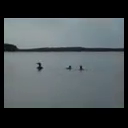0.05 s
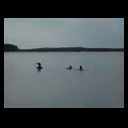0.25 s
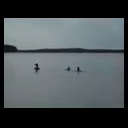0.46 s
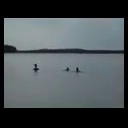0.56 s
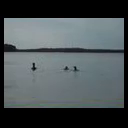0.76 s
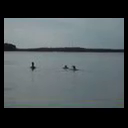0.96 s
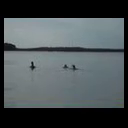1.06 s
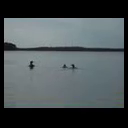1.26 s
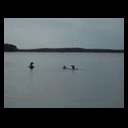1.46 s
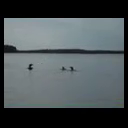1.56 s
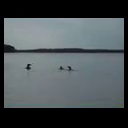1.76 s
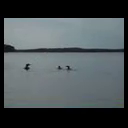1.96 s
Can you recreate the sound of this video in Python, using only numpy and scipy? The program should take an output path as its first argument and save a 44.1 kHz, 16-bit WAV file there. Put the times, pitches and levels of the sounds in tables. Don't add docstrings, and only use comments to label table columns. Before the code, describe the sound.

A loon calls once, loud and close: a low note leaps into a fast, high, pure wavering tremolo, then drops to a low close. A faint echo returns across the calm lake over soft water wash and hiss.

```python
import sys
import numpy as np
from scipy import signal
from scipy.fft import rfft, irfft, next_fast_len
from scipy.io import wavfile
from scipy.ndimage import uniform_filter1d, minimum_filter1d, map_coordinates

SR = 44100
rng = np.random.default_rng(int(sys.argv[2]) if len(sys.argv) > 2 else 0)


def to_wav(sig):
    pcm = np.clip(np.atleast_2d(sig), -1, 1) * 32767
    pcm = np.round(pcm).astype(np.int16)
    wavfile.write(sys.argv[1], SR, pcm.T)


def invert_db(level):
    return 10 ** (np.asarray(level, dtype=float) / 20)


N = 88200
T = np.arange(N) / SR
SKIP_S, LOST_S = .63702, .02


def unit(x):
    return x / np.sqrt(np.mean(x ** 2) + 1e-20)


def wobble(rate):
    return map_coordinates(rng.standard_normal(402), [np.clip(T * rate, 0, 400)])


def coloured(x, points):
    size = next_fast_len(N + 8192)
    hz, db = np.transpose(points)
    log_hz = np.log(np.fft.rfftfreq(size, 1 / SR) + 1)
    gain = invert_db(np.interp(log_hz, np.log(hz), db))
    return irfft(rfft(x, size) * gain, size)[:N]


def rush(points, patchy_db):
    spectrum = signal.stft(rng.standard_normal(N), nperseg=512)[2]
    field = uniform_filter1d(rng.standard_normal(spectrum.shape), size=5, axis=0)
    field = uniform_filter1d(field, size=10, axis=1)
    noise = signal.istft(spectrum * invert_db(patchy_db * unit(field)), nperseg=512)[1][:N]
    return unit(coloured(noise, points))


# (frequency [Hz], level [dB per Hz])
WASH_COLOUR = [(15, -41), (25, -15), (152, -4.5), (178, -3.5), (277, -1.5), (306, -1.5), (738, -6.5),
               (1190, -8), (3000, -24), (3900, -60.5), (6600, -120)]
# (time [s], level [dB])
WASH_LEVEL = [(0.0, -43), (0.17, -42), (0.43, -46), (0.67, -44), (0.87, -41), (2.0, -41.5)]
# (frequency [Hz], level [dB])
HISS_COLOUR = [(880, -33.5), (1500, -4.5), (3960, -13.5), (5240, -16), (5800, -14.5), (6000, -17.5),
               (8130, -18.5), (9620, -21.5), (10600, -33), (11200, -50), (11600, -110), (22000, -120)]
# (time [s], level [dB], length [s])
LAPS = [
    (.05, -72, 0.27),
    (1.648, -50, 0.03),
    (1.72, -52, 0.03),
    (1.852, -56, 0.03),
]


def lake():
    s, db = np.transpose(WASH_LEVEL)
    wash_db = np.interp(T, s, db) + 2.5 + 0.7 * wobble(6.3) + 0.3 * wobble(28.0)
    wash = invert_db(wash_db) * rush(WASH_COLOUR, patchy_db=1.5)
    lap_swell = sum(invert_db(db) * np.exp(-((T - s) / length) ** 2) for s, db, length in LAPS)
    lap_colour = [(12, -34.5), (30, 11), (80, -3), (200, -35.5), (400, -81)]
    laps = lap_swell * rush(lap_colour, patchy_db=2)
    hiss = invert_db(-50) * rush(HISS_COLOUR, patchy_db=-1.05)
    return wash + laps + hiss


# (frequency [Hz], level [dB rms])
HUM = [(183, -51.5), (307, -50.5), (7850, -69.5)]
# (offset from the centre [turns], level [dB rms])
WHINE = [(-3, -73), (-2, -69), (-1, -61), (0, -60), (1, -69), (2, -74), (3, -76)]
WHINE_HZ, TURN_HZ, WHINE_DB = 5602.8, 23.3, -3.5


def motors():
    hum = sum(invert_db(db + 0.93 * wobble(6.7)) * np.sin(2 * np.pi * hz * T + 1.1 * wobble(5.1))
              for hz, db in HUM)
    drift = 0.36 * wobble(6.7)
    whine = sum(invert_db(WHINE_DB + db) * np.sin(2 * np.pi * (WHINE_HZ + k * TURN_HZ) * T + drift + k * k)
                for k, db in WHINE)
    return np.sqrt(2) * (hum + whine)


def scatter(call, returns):
    tail = np.zeros(N)
    for delay, db, t60 in returns:
        decay = invert_db(-60 * np.clip(T - delay, 0, 9) / t60) * (T > delay)
        tail += invert_db(db) * unit(decay) * rng.standard_normal(N)
    return signal.fftconvolve(call, tail)[:N] / np.sqrt(N)


# (delay [s], level [dB], t60 [s])
CLOSE = [(0.054, -29, 0.032), (0.101, -31, 1)]
# (frequency [Hz], level [dB])
CLOSE_COLOUR = [(400, -13.5), (700, -4), (1000, -8), (1150, -1.5), (1290, 1), (1800, -7.5), (2500, -21),
                (5000, -31.5)]
# (delay [s], level [dB], t60 [s])
TREES = [(.612, -36, .03), (.63, -35, .08), (.67, -39, .25),
         (.72, -43, 0.2), (0.848, -36.5, 1), (1.1, -41.5, 1)]
# (frequency [Hz], level [dB])
SHORE_COLOUR = [(400, 0), (700, 3.5), (890, -5), (1010, 1.5), (1150, 4), (1290, -1.5), (1700, -7.5),
                (5000, -41)]
BANK_S, BANK_DB = .606, -32


def shore(call):
    close = coloured(scatter(call, CLOSE), CLOSE_COLOUR)
    close = np.where(T <= SKIP_S, close, np.roll(close, -round(LOST_S * SR)))
    bank = invert_db(BANK_DB + 2 * wobble(70)) * np.roll(call, round(BANK_S * SR))
    trees = scatter(call, TREES)
    return close + coloured(bank + trees, SHORE_COLOUR)


def lift(hz, pipe):
    return np.sqrt(sum(invert_db(2 * g) / (1 + (2 * (hz - c) / w) ** 2) ** 2 for c, w, g in pipe))


# (time [s], length [s], level [dB])
SHIVER = (.715, .035, -32)
GLIDE_S, EDGE_S = .006, .0073
BREATH_DB, SHIMMER_DB = -45.5, .3
FLUTTER_DB, FLUTTER_RATE, LAG = 2.6, 70, 2.6
BILL_FROM_HZ = 3100
STRETCH_S, STRETCH_SPAN_S = .29, .012
OCTAVE_LEAD, OCTAVE_SWING = .4, .7


def note(rows, pipe, later=None, turn=0, start=None):
    s, *cols = np.transpose(rows)
    glide = max(int(GLIDE_S * SR), 1)
    hz, db, bill_db = (uniform_filter1d(np.interp(T, s, c), glide) for c in cols)
    cycles = np.cumsum(hz) / SR
    phase = 2 * np.pi * (cycles - np.interp(SKIP_S, T, cycles) + turn)
    rise = T > start if start else np.clip((T - s[0]) / EDGE_S + .5, 0, 1)
    fall = np.clip((s[-1] - T) / EDGE_S + .5, 0, 1)

    breath = invert_db(BREATH_DB) * rush([(50, 0), (600, 0), (1500, -20), (9000, -60)], patchy_db=2)
    shiver_s, shiver_length, shiver_db = SHIVER
    shiver = np.exp(-((T - shiver_s) / shiver_length) ** 2) * np.cos(phase / 4)
    tone = np.sin(phase) * (1 + breath + 2 * invert_db(shiver_db) * shiver)

    moved = (1 + np.tanh((T - STRETCH_S) / STRETCH_SPAN_S)) / 2
    centre, width = pipe[0][:2]
    octave = OCTAVE_LEAD - OCTAVE_SWING * np.tanh(2 * (2 * hz - centre - 40) / width)
    for k in range(2, 13):
        gain = lift(k * hz, pipe) ** (1 - moved) * lift(k * hz, later or pipe) ** moved
        lag = LAG * (k - 1) - (k == 2) * octave
        upper = 1 / (1 + (BILL_FROM_HZ / (k * hz)) ** 8)
        opening = invert_db(upper * (bill_db + FLUTTER_DB * wobble(FLUTTER_RATE)))
        tone += gain * opening * np.sin(k * phase - lag)
    return np.sqrt(2) * rise * fall * invert_db(db + SHIMMER_DB * wobble(150)) * tone


# (time [s], pitch [Hz], fundamental [dB rms], bill opening on the upper overtones [dB])
OPENING = [(.213, 680, -28, -33.5), (.221, 764, -21.5, -16.5), (.241, 799.6, -18.5, -1.5),
           (.268, 727.5, -16.5, 2.5), (.289, 708, -15, -2), (.304, 810, -16, 0), (.313, 850, -10.5, 4),
           (.333, 911.8, -3.5, -15), (.356, 887, -8, -3.5)]
WAVERS = [
    [(.36, 1075, -18, 0), (.366, 1057, -10, 2), (.388, 1005, -12, -4), (.402, 1165, -8.5, 2),
     (.41, 1232, -3.8, 3), (.428, 1308, -3.5, -8), (.441, 1262, -6.5, -8), (.45, 1134, -12.5, -7),
     (.466, 1022, -14, 0)],
    [(.482, 1000, -16, -7), (.492, 1012, -15.5, -6), (.506, 1180, -12.5, 0), (.517, 1252, -5.5, 2),
     (.531, 1302, -4, -9), (.541, 1260, -7.3, -7), (.551, 1132, -13.5, -8), (.564, 1035, -13.5, -2),
     (.59, 1005, -16, -8)],
    [(.599, 1008, -16, -8), (.612, 1160, -13.5, -2), (.626, 1250, -7.3, 0), (.637, 1262, -5.8, -3),
     (.645, 1210, -8, -6), (.658, 1035, -11, 0)],
]
LAST_WAVER = [(.637, 1035, -11, 0), (.65, 1010, -13, -3), (.684, 985, -13.5, -5), (.697, 1108, -12.3, 0),
              (.707, 1163, -12, 0), (.717, 1175, -11, -2), (.742, 1055, -11, 1), (.757, 993, -13, -5),
              (.776, 975, -15, -12)]
CLOSING = [(.777, 708, -15, 0.5), (.785, 691, -17.5, -3.5), (.815, 703, -16.5, 1.5),
           (.833, 679, -18.5, -11), (.845, 666.4, -22, -12), (.861, 637, -25, -28), (.875, 636, -32.5, -24),
           (.89, 614, -41.5, -17)]
# (frequency [Hz], width [Hz], level re fundamental [dB])
PIPE_OPENING = [(1580, 140, 2.5), (2355, 130, -15.5), (3710, 500, -25.5), (4580, 520, -22.5),
                (5190, 600, -26.5), (5750, 400, -15.5), (6700, 500, -36.5), (7930, 1300, -45.5)]
PIPE_STRETCHED = [(1681, 260, -1), (2760, 250, -25), (3640, 220, -25.5), (4120, 300, -21),
                  (5260, 180, -21.5), (5674, 610, -13.5), (6040, 330, -22), (8000, 390, -44),
                  (9060, 900, -44.5)]
PIPE_HIGH = [(2390, 360, -28), (3500, 250, -45), (4060, 130, -45), (4225, 300, -33.5), (4763, 290, -24.5),
             (5400, 300, -26), (5650, 250, -31), (6230, 500, -36), (7500, 800, -45.5), (8700, 830, -57.5)]
PIPE_LAST = [(2414, 345, -19.5), (3530, 180, -32), (4100, 570, -33), (4530, 610, -31), (5370, 530, -38.5),
             (6000, 340, -44)]
PIPE_CLOSING = [(1320, 290, -9.5), (2050, 380, -49), (2810, 260, -38), (3466, 350, -23), (4190, 300, -31),
                (4800, 250, -36), (5420, 400, -26.5)]


def bird():
    opening = note(OPENING, PIPE_OPENING, PIPE_STRETCHED)
    wavers = note(np.vstack(WAVERS), PIPE_HIGH, turn=-.15)
    last_waver = note(LAST_WAVER, PIPE_LAST, turn=-.07, start=.6)
    closing = note(CLOSING, PIPE_CLOSING)
    return opening + wavers, last_waver + closing


# (frequency [Hz], level [dB])
BAND = [(20, 0), (9000, 0), (10200, -8), (11300, -35), (12500, -90), (22000, -120)]
TOP, CLIP, HARD = .69, .74, 14
CATCH_S, STEP_S = .005, .0023


def limited(x):
    peak = -minimum_filter1d(-np.abs(x), size=64)
    lag, step = round(CATCH_S * SR), round(STEP_S * SR)
    wanted = np.pad(TOP / np.maximum(peak, TOP), (lag, 0), "edge")
    gain = signal.lfilter(np.ones(lag) / lag, 1, wanted)[lag:]
    held = x * gain[np.arange(N) // step * step]
    return coloured(held / (1 + np.abs(held / CLIP) ** HARD) ** (1 / HARD), BAND)


DUCK_FROM_DB, DUCK_RATIO, DUCK_RELEASE_S = -9, 1, .21


def ducking(call):
    power = np.abs(uniform_filter1d(call ** 2, size=220))
    over_db = np.clip(10 * np.log10(power + 1e-9) - DUCK_FROM_DB, 0, 30)
    fade = np.exp(-1 / (DUCK_RELEASE_S * SR))
    released = signal.lfilter([1 - fade], [1, -fade], 4.4 * over_db)
    return DUCK_RATIO * np.maximum(over_db, released)


def thump():
    swell = np.clip((T - .308) / .082, 0, 99)
    return -invert_db(-34.5) * (1 - np.exp(-6 * swell)) * np.exp(-swell)


def scene():
    before, after = bird()
    call = np.where(T <= SKIP_S, limited(before), limited(after))
    in_air = np.where(T <= SKIP_S + LOST_S, before, np.roll(after, round(LOST_S * SR)))
    floor = shore(in_air) + lake() + motors()
    return (call + thump() + invert_db(-ducking(call)) * floor)[None]


def top_cut(x):
    return signal.sosfilt(signal.butter(12, 16000, fs=SR, output="sos"), x)


def record(dry):
    return top_cut(dry)


dry = scene()
out = record(dry)
to_wav(out)
```